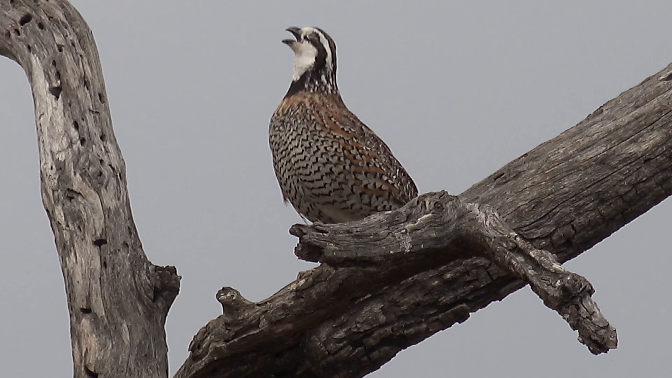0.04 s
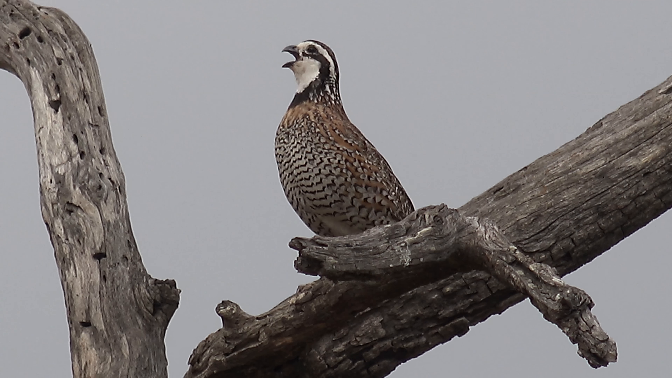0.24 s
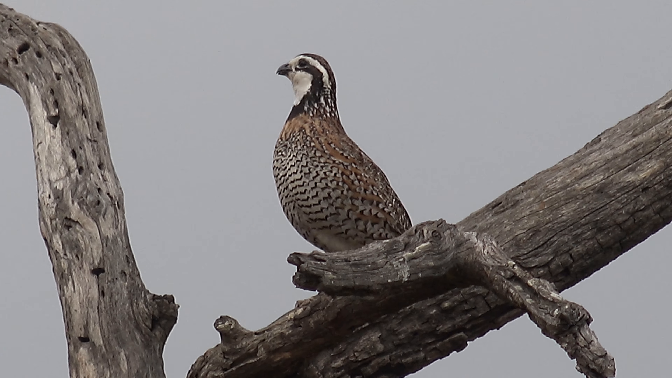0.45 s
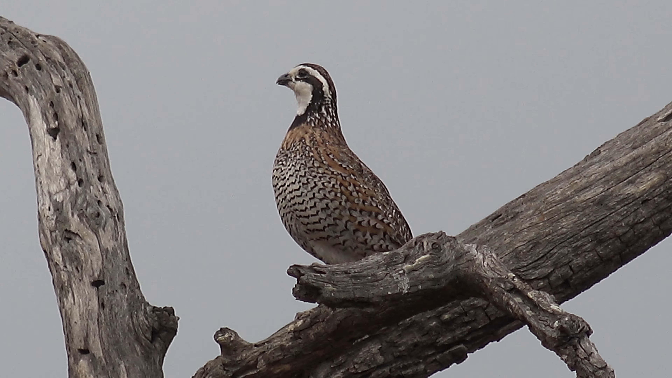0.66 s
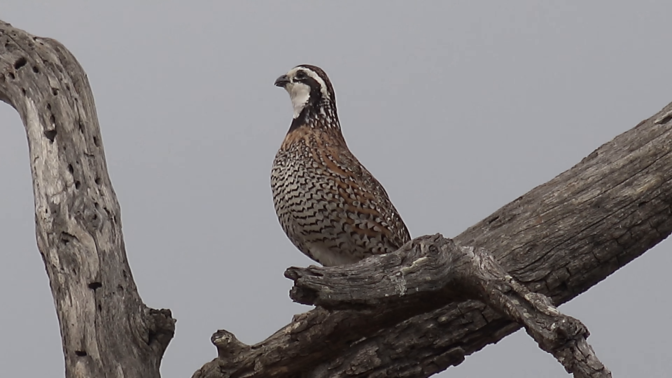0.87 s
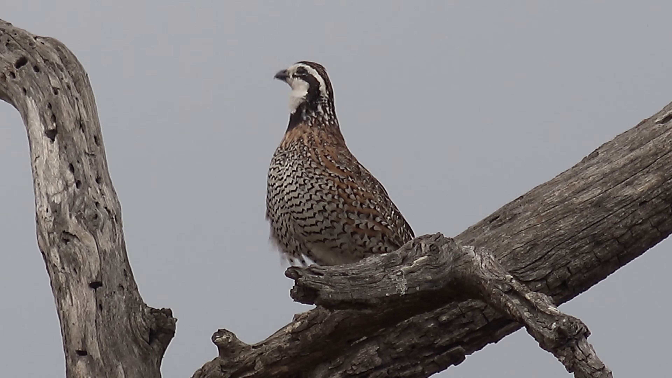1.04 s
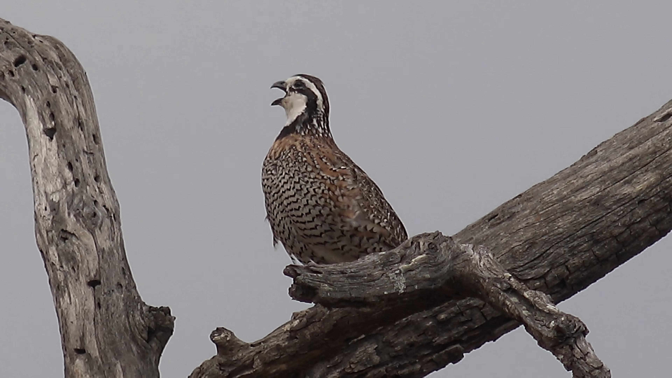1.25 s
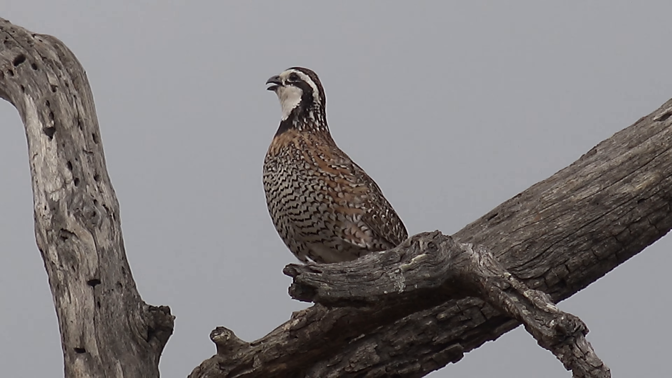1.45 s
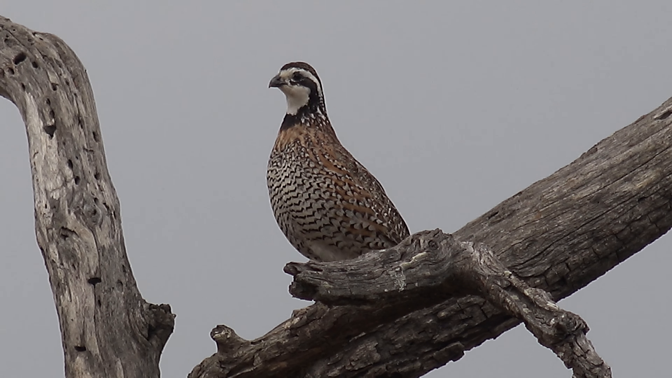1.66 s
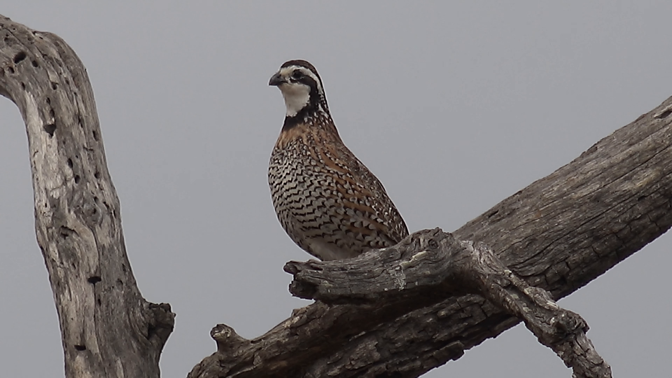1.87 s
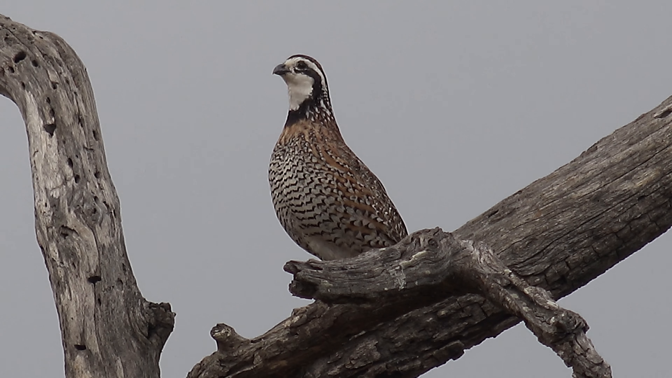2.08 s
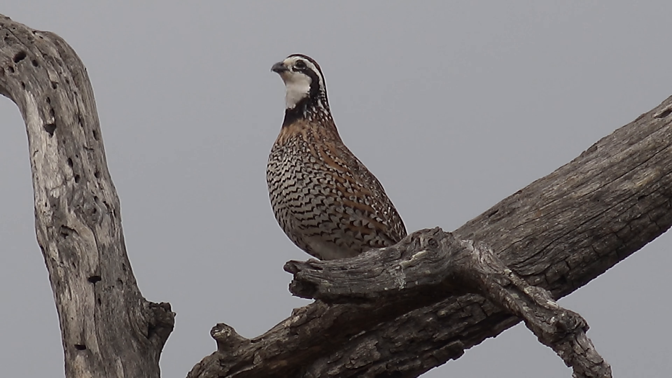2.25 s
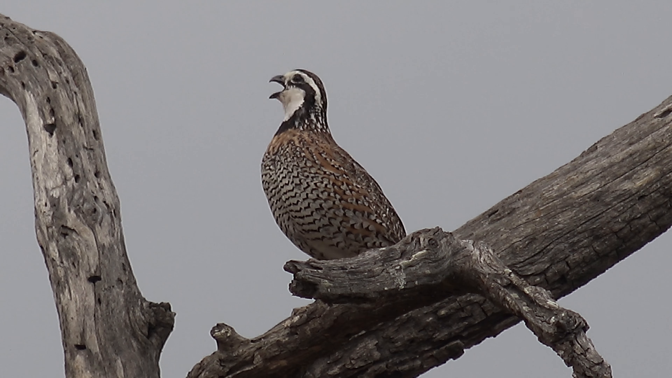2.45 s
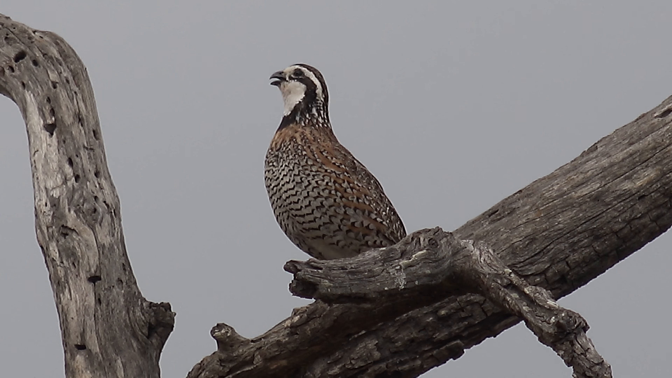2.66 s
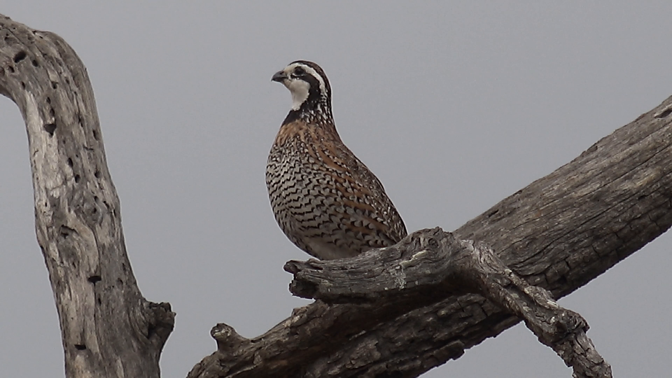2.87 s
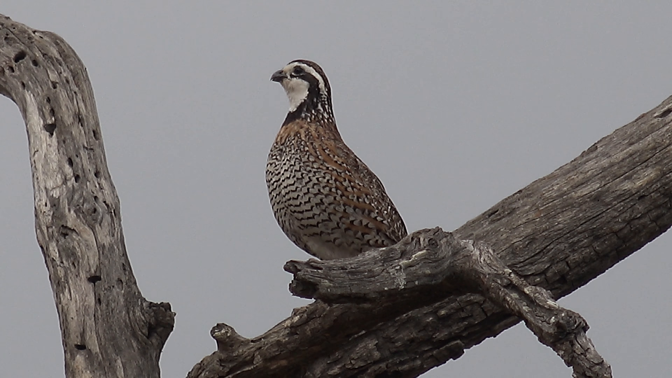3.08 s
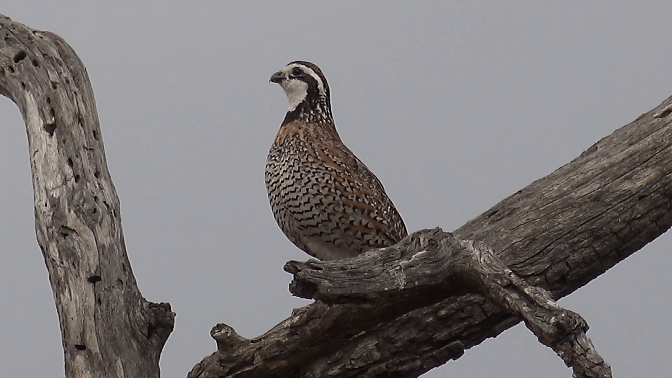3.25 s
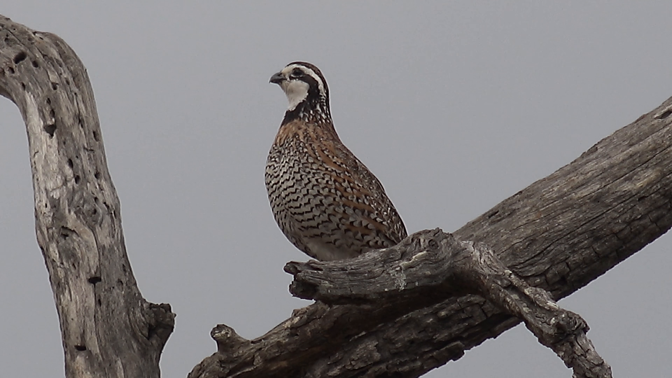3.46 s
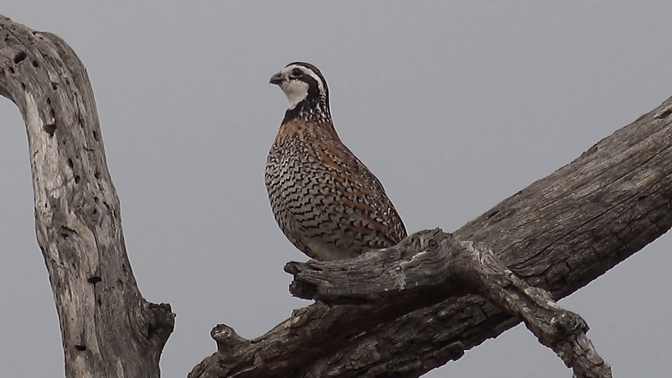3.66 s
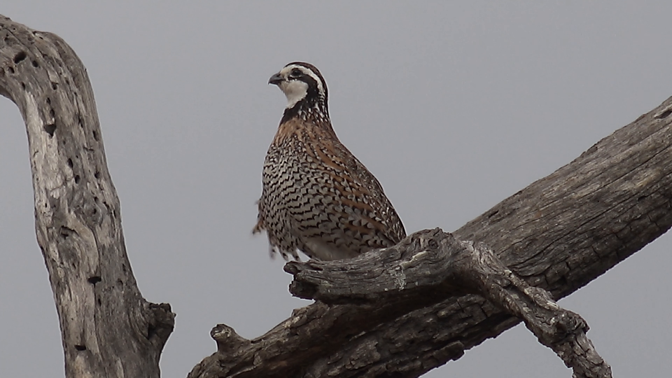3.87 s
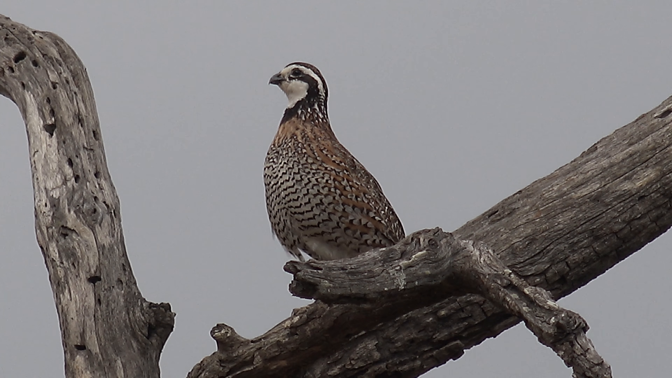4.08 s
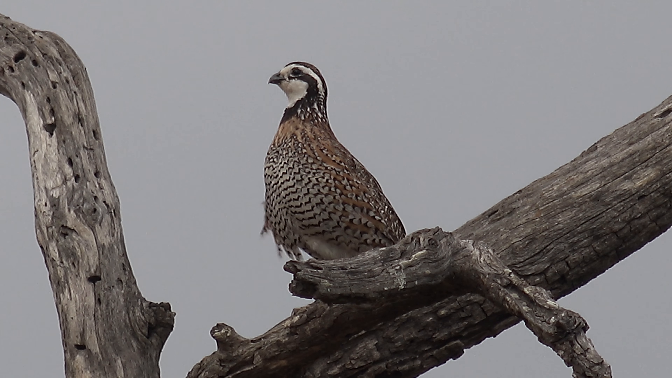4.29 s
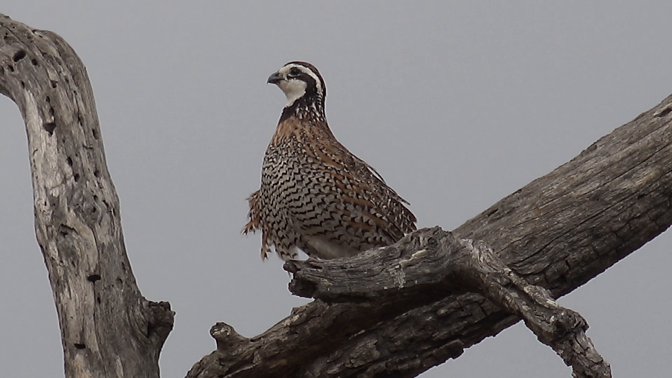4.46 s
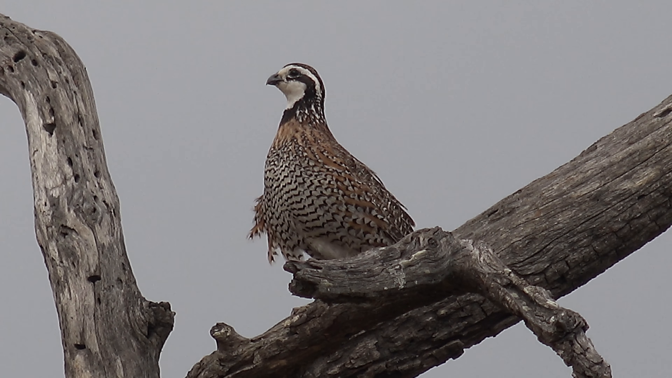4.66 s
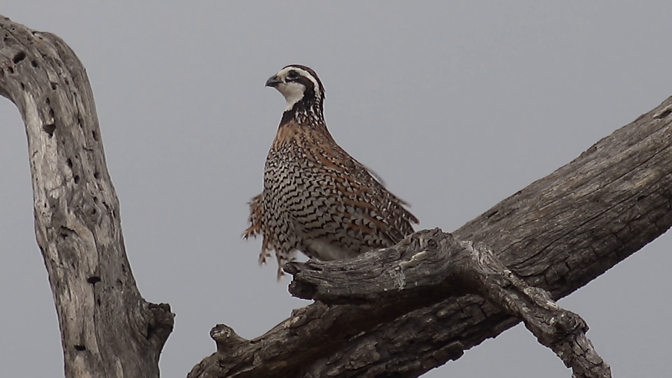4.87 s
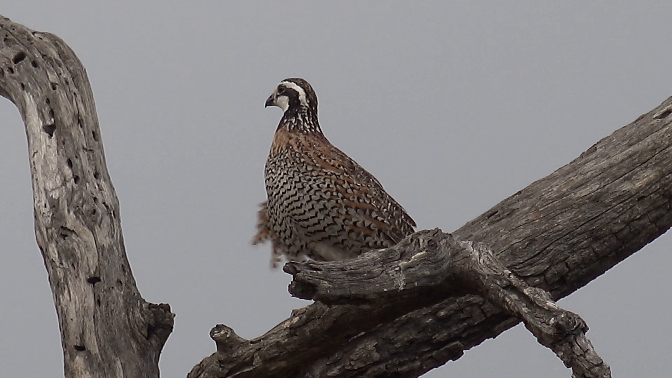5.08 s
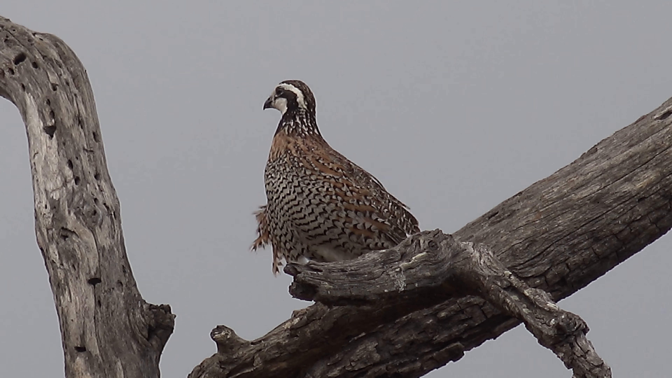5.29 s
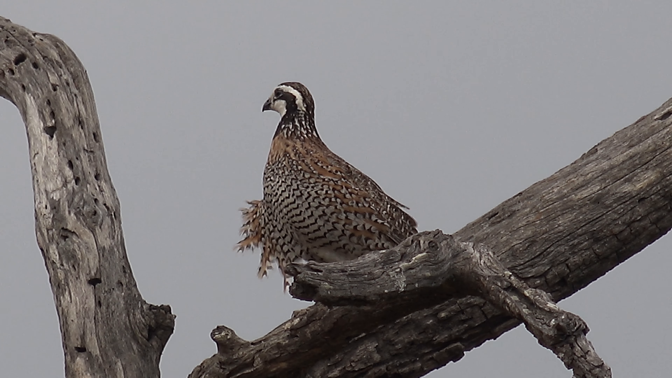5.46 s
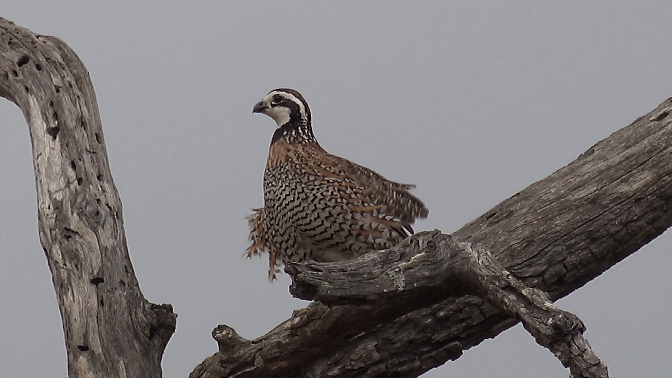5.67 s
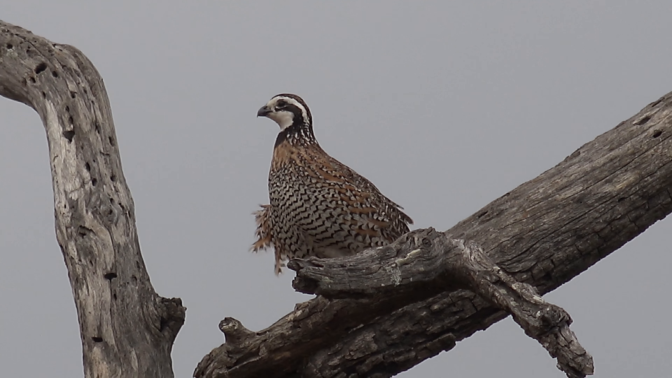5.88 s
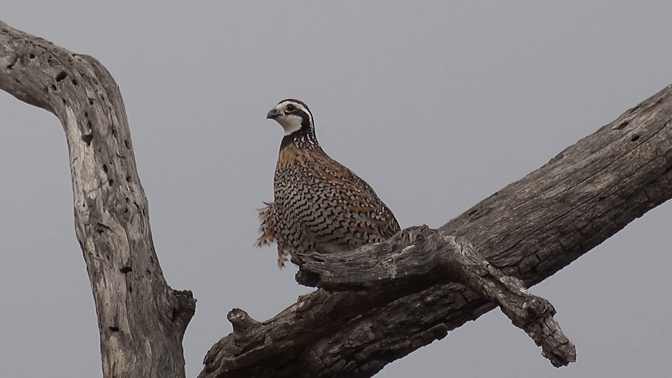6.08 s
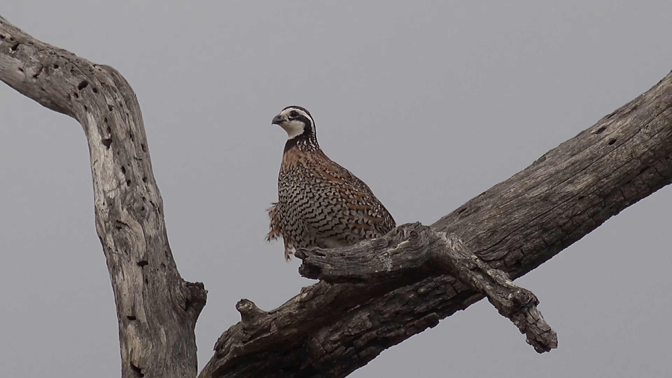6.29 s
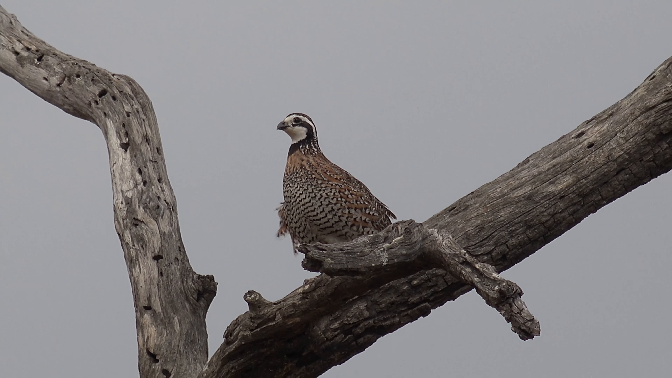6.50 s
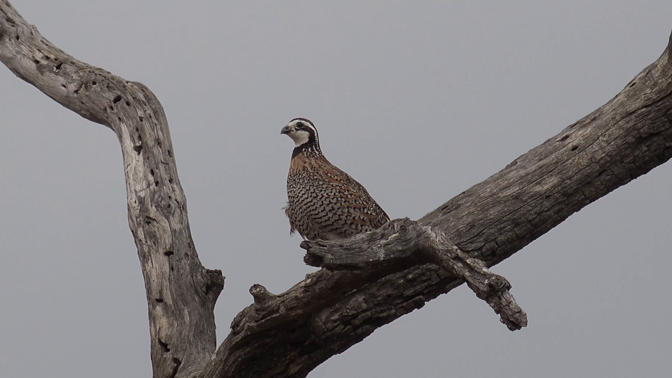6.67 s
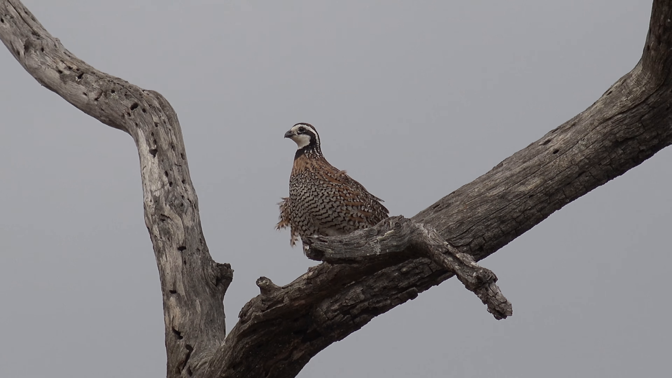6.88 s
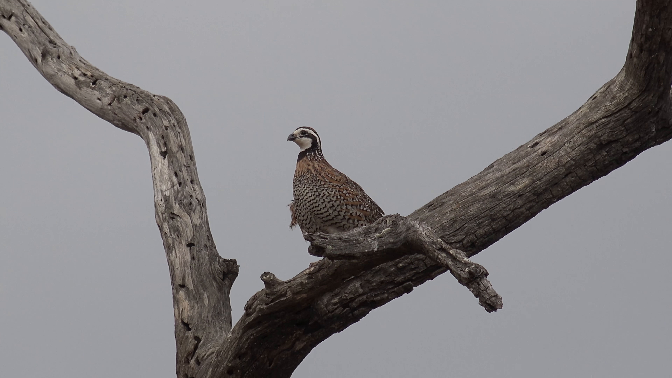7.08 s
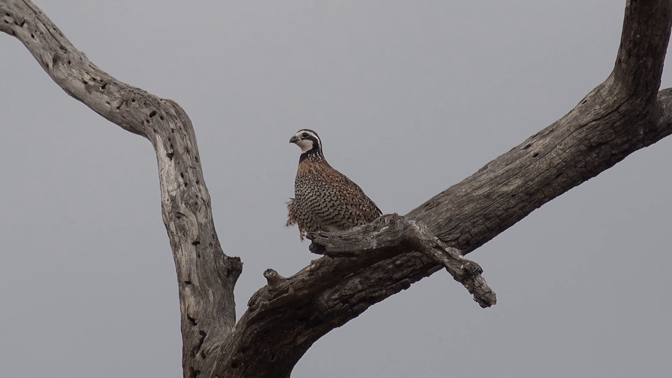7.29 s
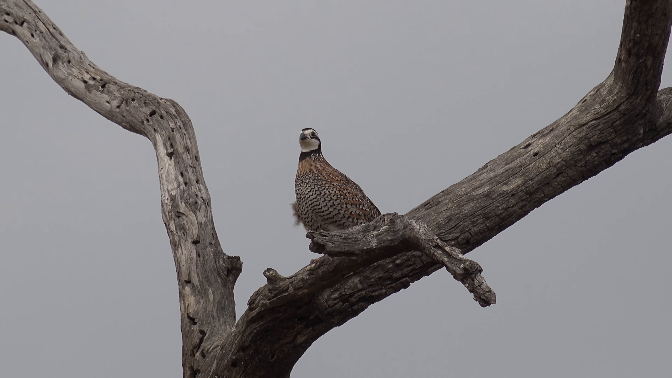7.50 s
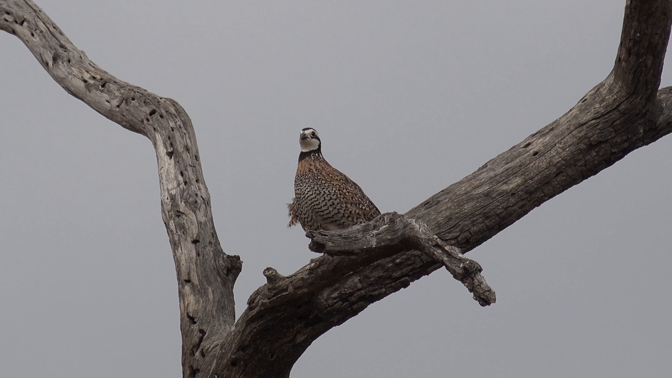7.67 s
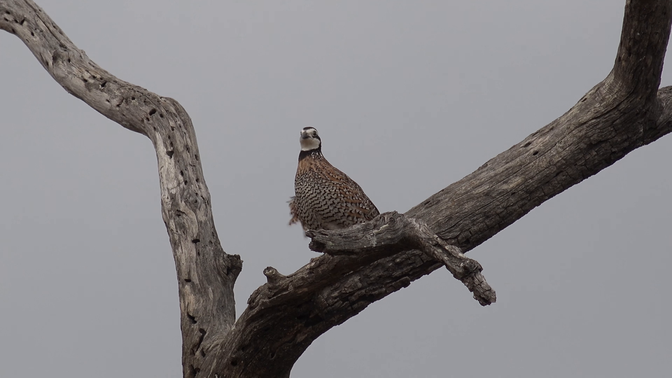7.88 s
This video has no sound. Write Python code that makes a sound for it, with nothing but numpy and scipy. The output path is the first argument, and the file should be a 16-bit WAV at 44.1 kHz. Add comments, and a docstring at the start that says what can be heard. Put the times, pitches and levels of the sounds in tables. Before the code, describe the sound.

A bobwhite quail gives three loud, short whistles about a second apart, each rising in pitch and breaking into a harsh falling slur. A nearby camera shutter clacks during the first call. Afterwards, much fainter songbirds whistle, chip and rasp in the brush over a distant chorus and soft outdoor air. The close shutter clacks again past the middle, with light gear ticks and faint shutters farther off in a small hide.

```python
"""A bobwhite quail whistles three rising calls, each breaking into a harsh falling slur.
The whistle is nearly pure; after the break its harmonics slide past a fixed throat resonance.
Songbirds whistle, chip and rasp in the brush over a far chorus and faint open air.
Still cameras clack mirror and shutter in a small hide, one close by; gear ticks and a stand bumps."""
import sys
import numpy as np
from scipy import signal
from scipy.fft import rfft, irfft, next_fast_len
from scipy.io import wavfile
from scipy.ndimage import uniform_filter1d

SR = 44100
rng = np.random.default_rng(int(sys.argv[2]) if len(sys.argv) > 2 else 0)


def generate_wav(sig):
    """Save sig (samples, or channels by samples) to the path in sys.argv[1] as 16-bit PCM at SR."""
    pcm = np.round(np.clip(np.atleast_2d(sig).T, -1, 1) * 32767).astype(np.int16)
    wavfile.write(sys.argv[1], SR, pcm)


N = 350154
TIME = np.arange(N) / SR
UPSLUR_S, WHISTLE_HZ, WHISTLE_DB = .046, 1868, -6


def quail(throat_db=16, throat_width_hz=620, jitter=.025, flutter_db=2.8, ground_s=.011, ground_db=-15):
    """Harmonic voice through throat and beak; in the fall the throat picks out successive harmonics."""
    # start_s, level_db, pitch_ratio, dip_s (level dip, timed from the start of the whistle)
    calls = [(0.034, -22.5, 1, 0.091), (1.124, -23, 1.003, 0.076), (2.327, -24.5, 1.0, 0.083)]
    # radiation from the open beak: freq_hz, gain_db
    beak = [(650, -15), (1300, -10), (1900, -1), (2600, 0), (3250, 0), (3800, -11), (5100, -10),
            (5600, -40), (6000, -32), (6600, -20), (7700, -20), (9300, -18), (10600, -42), (16000, -58)]
    # air rasping through the throat: freq_hz, density_db
    rasp_spectrum = [(300, -30), (1300, -17), (1900, -3), (2600, 0), (3250, -4), (4000, -18), (7000, -28),
                     (13000, -46)]
    out = np.zeros(N)
    controls = np.hstack([upslur(), whistle(), fall()])
    pitch_hz, throat_hz, level_db, harsh = uniform_filter1d(controls, size=240, axis=1)
    size = len(pitch_hz)
    t = TIME[:size]
    harmonic = np.arange(1, 13)[:, None]
    overtone_db = -3 * harsh ** 2 * (harmonic > 1)
    attack = np.minimum(t / .0033, 1)
    # alternate cycles differ early in the call: a line between the first two harmonics
    undertone_gain = from_db(-36) * (1 - harsh) * np.clip((.15 - t) / .045, 0, 1)
    # turbulence needs a really harsh voice and radiates best at a high throat resonance
    turbulence = np.clip(2 * harsh - .5, 0, 1) * from_db(at_hz(beak, throat_hz) - 11.5)
    for start_s, call_db, pitch_ratio, dip_s in calls:
        hz = pitch_hz * pitch_ratio * (1 + jitter * harsh * wobble(700, size) + .0012 * wobble(120, size))
        partial_hz = harmonic * hz
        resonance_db = throat_db * (bell(partial_hz, throat_hz, throat_width_hz) - 1)
        gains = from_db(at_hz(beak, partial_hz) + resonance_db + overtone_db) * (partial_hz < SR / 2)
        phase = 2 * np.pi * np.cumsum(hz) / SR
        flutter = from_db(flutter_db * harsh * wobble(500, size))
        voice = np.sqrt(2) * np.sum(gains * np.sin(harmonic * phase), axis=0) * flutter
        undertone = undertone_gain * np.sin(1.5 * phase)
        rasp = diffuse(rasp_spectrum, size)[0] * (1 + .5 * np.cos(phase)) * turbulence
        dip_db = -10 * bell(t, UPSLUR_S + dip_s, .0047)
        add(out, start_s, (voice + undertone + rasp) * attack * from_db(level_db + call_db + dip_db))
    # the ground bounce beats against the fast sweeps and thickens them
    bounce = from_db(ground_db) * np.interp(TIME - ground_s, TIME, out, left=0)
    direct = place(out + bounce, pan_db=1.8, lead_samples=1.2)
    return direct + brush(out, early_db=-18, early_t60_s=.24, late_db=-34, late_t60_s=1.2)


def upslur(rise_s=.018, leap_s=.011):
    """Soft hoarse opening: rise, step, leap to the whistle. Rows: pitch_hz, throat_hz, level_db, harsh."""
    t = TIME[:round(UPSLUR_S * SR)]
    stages_s = [0, rise_s, UPSLUR_S - leap_s, UPSLUR_S]
    pitch_hz = np.interp(t, stages_s, [830, 1291, 1419, WHISTLE_HZ])
    level_db = np.interp(t, stages_s, [-24.5, -22.5, -18, WHISTLE_DB])
    harsh = np.interp(t, stages_s, [.46, .92, .92, 0])
    return [pitch_hz, pitch_hz, level_db, harsh]


def whistle(length_s=.154, bend_hz=326.8, bend_s=.042, swell_db=6, surge_db=7.5, surge_s=.0027, harsh=.04):
    """Swells, bends ever faster upward, surges before the break; throat tracks pitch. Rows as upslur."""
    t = TIME[:round(length_s * SR)]
    pitch_hz = WHISTLE_HZ + bend_hz * np.exp((t - length_s) / bend_s)
    level_db = WHISTLE_DB + swell_db * t / length_s + surge_db * bell(t, length_s - surge_s, surge_s)
    return [pitch_hz, pitch_hz, level_db, np.full(len(t), harsh)]


def fall(length_s=.098, slide_hz_per_s=8700, throat_hz=2562, edge_s=.013, fade_db=12, harsh=.66):
    """The broken voice catches in a higher register, then drops and fades. Rows as upslur."""
    t = TIME[:round(length_s * SR)]
    register_hz = 230.8 * (t < .014)
    pitch_hz = 1480 - slide_hz_per_s * t + register_hz
    edges_db = np.interp(t, [0, edge_s, length_s - edge_s, length_s], [-9, 0, 0, -20])
    level_db = -3 - fade_db * t / length_s + edges_db
    return [pitch_hz, np.full(len(t), throat_hz), level_db, np.full(len(t), harsh)]


def cameras(latch_s=.0037, latch_db=-4.5, rebound_s=.0115):
    """Close camera: latch, blow and rebound of mirror and shutter. Far ones repeat one mirror cycle."""
    # close mirror and shutter blows: start_s, relative_db, rebound_db
    close_blows = [(0.203, -20, -2.5), (0.2548, -19.5, 1), (0.291, -26.5, -30), (5.2483, -19.5, -5.5),
                   (5.288, -25.5, -23)]
    # far shutter releases: start_s, relative_db
    releases = [(0.706, -42), (2.524, -41), (2.962, -47), (4.189, -41.5), (5.205, -44), (5.449, -46),
                (5.931, -41.5), (7.173, -46.5), (7.879, -52)]
    # contacts of mirror up, shutter, mirror down: delay_s, relative_db
    mirror_cycle = [(0, -4), (0.017, -4), (.096, -3), (0.102, -3.5), (.136, -9.5), (0.146, -3)]
    far_contacts = [(start_s + delay_s, release_db + contact_db)
                    for start_s, release_db in releases for delay_s, contact_db in mirror_cycle]
    close_contacts = [(start_s + delay_s, blow_db + contact_db)
                      for start_s, blow_db, rebound_db in close_blows
                      for delay_s, contact_db in [(-latch_s, latch_db), (0, 0), (rebound_s, rebound_db)]]
    far = clacks(far_contacts, crack_t60_s=.069, tail_db=-5, tail_t60_s=.22,
                 grain_db=-3.5, boom_db=4.5, treble_db=-62, pan_db=3)
    close = clacks(close_contacts, crack_t60_s=.078, tail_db=-17.5, tail_t60_s=.18,
                   grain_db=2.5, boom_db=-3, treble_db=-.5, pan_db=5)
    return from_db(-4.5) * far + from_db(-9.5) * close


def clacks(contacts, crack_t60_s, tail_db, tail_t60_s, grain_db, boom_db, treble_db, pan_db):
    """Each contact is a rattling crack of the body; the hide rings on, longer and later in the lows."""
    # ring of a camera body: freq_hz, density_db
    body_spectrum = [(40, -53), (90, -11), (200, -25), (280, -20.5), (350, -1.5), (450, -13.5), (700, -0.5),
                     (1050, -4.5), (1500, 1), (2500, 4), (4500, 4), (7000, -6.5), (10000, -16),
                     (15000, -22.5)]
    crack_power, tail_power, boom_power = np.zeros((3, N))
    t = TIME[:SR // 2]
    boom_shape = np.minimum(t / .0009, 1) * from_db(-60 * t / (1.29 * tail_t60_s))
    for start_s, level_db in contacts:
        add(crack_power, start_s, from_db(level_db - 60 * t / crack_t60_s) ** 2)
        add(tail_power, start_s, from_db(level_db + tail_db - 60 * t / tail_t60_s) ** 2)
        add(boom_power, start_s, (from_db(level_db + boom_db) * boom_shape) ** 2)
    ring = diffuse(body_spectrum, N)
    lows = butterworth(diffuse(body_spectrum, N), "low", 1700, order=2)
    bright = ring + from_db(treble_db) * butterworth(ring, "high", 6000)
    rattle = from_db(grain_db * np.tanh(wobble(740, N)))
    crack = bright * np.sqrt(crack_power) * rattle
    hide = ring * np.sqrt(tail_power) + lows * np.sqrt(boom_power)
    return (crack + hide) * from_db([[pan_db / 2], [-pan_db / 2]])


def gear_ticks(tail_db=-17, tail_t60_s=.054):
    """Light touches on the gear: one broad resonance each and a short ring of the hide."""
    # start_s, level_db, resonance_hz, width_hz, t60_s
    touches = [(2.017, -51.5, 1280, 700, 0.057), (2.187, -50, 1600, 1600, 0.17),
               (2.218, -47.5, 1420, 1080, 0.12), (4.599, -51.5, 1190, 897.5, 0.091),
               (4.6, -39.5, 4100, 2430, 0.012), (5.045, -28, 5300, 2230, 0.022),
               (5.052, -42, 5040, 3000, 0.095), (5.14, -54, 2090, 1440, 0.18),
               (7.727, -40.5, 1310, 795, 0.032)]
    out, t = np.zeros((2, N)), TIME[:SR // 4]
    for start_s, level_db, resonance_hz, width_hz, t60_s in touches:
        radius = np.exp(-np.pi * width_hz / SR)
        feedback = [1, -2 * radius * np.cos(2 * np.pi * resonance_hz / SR), radius ** 2]
        noise = diffuse([(200, .5), (1500, 3), (15000, -10)], len(t))
        body = rms_one(signal.lfilter([1, 0, -1], feedback, noise))
        decay = from_db(-60 * t / t60_s) + from_db(tail_db - 60 * t / tail_t60_s)
        add(out, start_s, from_db(level_db) * body * decay)
    return out * from_db([[1.2], [-1.8]])


def songbirds(hoarse=.75, whip_middle_hz=3690, whip_hz_per_s=52300, pip_hz=3960, pip_gap_s=.065):
    """Whistled notes from the brush, one pitch shape per kind, wet with distance."""
    out = np.zeros(N)

    def sing(start_s, level_db, pitch_hz, buzz, throb_db=2):
        add(out, start_s, from_db(level_db) * note(pitch_hz, buzz, throb_db))

    # start_s, length_s, first_hz, last_hz, level_db
    held_whistles = [(0.996, 0.2, 5010, 5120, -70.5), (3.183, 0.038, 3370, 3520, -60),
                     (3.719, 0.15, 3170, 3170, -64.5), (3.935, 0.15, 3240, 3260, -60),
                     (5.643, 0.21, 3615, 3707, -56), (6.278, 0.25, 3552, 3690, -60),
                     (7.378, .36, 3635, 3595, -55)]
    for start_s, length_s, first_hz, last_hz, level_db in held_whistles:
        sing(start_s, level_db, slide(length_s, first_hz, last_hz), buzz=.37, throb_db=2.16)
    # start_s, level_db
    far_rises = [(6.133, -74.5), (6.523, -72.5)]
    for start_s, level_db in far_rises:
        sing(start_s, level_db, glide(.15, (1535, 1930, 2155)), buzz=0)
    # start_s, length_s, last_hz, level_db
    upward_whips = [(3.567, .036, 3840, -53.5), (3.875, 0.037, 3670, -53), (4.165, 0.034, 3820, -52.5),
                    (4.47, 0.018, 4250, -47.5), (4.757, 0.018, 4260, -52.5), (5.614, 0.029, 4100, -51),
                    (6.261, 0.022, 4660, -53), (6.677, 0.0203, 4440, -62), (7.05, 0.015, 4800, -58.5),
                    (7.127, 0.018, 4450, -61), (7.776, 0.019, 5000, -62)]
    for start_s, length_s, last_hz, level_db in upward_whips:
        first_hz = whip_middle_hz - whip_hz_per_s * length_s / 2
        sing(start_s, level_db, glide(length_s, (first_hz, whip_middle_hz, last_hz)), hoarse)
    # start_s, first_hz, last_hz, level_db
    rasps = [(1.635, 2560, 2090, -71), (2.045, 2640, 2065, -65), (4.43, 2400, 3580, -57),
             (4.541, 3410, 2380, -54), (5.956, 2690, 2140, -58.5), (6.157, 2650, 2276, -54.5),
             (6.354, 2700, 2250, -55), (6.575, 2667, 2267, -57), (6.816, 2680, 2314, -56.5),
             (7.01, 2250, 1880, -66.5)]
    for start_s, first_hz, last_hz, level_db in rasps:
        sing(start_s, level_db, slide(.056, first_hz, last_hz), hoarse)
    # clear arched whistles that trail off hoarsely: start_s, length_s, level_db
    arches = [(1.775, 0.15, -69), (2.869, 0.071, -65.5), (4.735, .13, -55), (5.522, 0.1, -55.5)]
    for start_s, length_s, level_db in arches:
        sing(start_s, level_db, glide(length_s, (2440, 2590, 2270)), buzz=.15)
        sing(start_s + .75 * length_s, level_db - 6, glide(.15, (2440, 2320, 2242)), hoarse)
    # high swoop, then a lower slur: start_s, pitch_ratio, level_db
    two_note_songs = [(3.175, 0.96, -59.5), (6.832, 0.95, -61)]
    for start_s, pitch_ratio, level_db in two_note_songs:
        sing(start_s, level_db, pitch_ratio * glide(.14, (7340, 4670, 4330)), buzz=.28)
        sing(start_s + .16, level_db - 2.5, pitch_ratio * glide(.17, (3856, 3340, 2485)), buzz=.16)
    # start_s, level_db
    downward_flicks = [(1.605, -80), (1.649, -68), (1.88, -63.5), (2.084, -70), (2.263, -63), (2.865, -72),
                       (6.771, -65)]
    for start_s, level_db in downward_flicks:
        sing(start_s, level_db, glide(.036, (5350, 4450, 3320)), buzz=.1)
    # start_s, level_db
    pip_pairs = [(1.445, -61.5), (3.229, -60.5), (4.149, -56), (5.144, -58), (6.493, -58)]
    for start_s, level_db in pip_pairs:
        for delay_s in 0, pip_gap_s:
            sing(start_s + delay_s, level_db, slide(.037, pip_hz, pip_hz), buzz=0)
    # start_s, level_db
    buzzes = [(3.464, -59), (3.776, -60.5)]
    for start_s, level_db in buzzes:
        sing(start_s, level_db, slide(.048, 4210, 4210), hoarse)
    # start_s, level_db
    chips = [(1.691, -56.5), (1.954, -62), (2.164, -55.5), (2.423, -52.5), (5.46, -58), (5.741, -59),
             (6.081, -61)]
    # hooked shape of a chip: time_s, pitch_hz
    hook = [(0, 6700), (.003, 5700), (.007, 5450), (.015, 5700), (.026, 5980)]
    hook_hz = np.interp(TIME[:round(hook[-1][0] * SR)], *np.transpose(hook))
    for start_s, level_db in chips:
        sing(start_s, level_db, hook_hz, buzz=.45)
    # start_s, level_db
    thin_lisps = [(5.43, -77), (5.562, -66.5), (5.725, -79), (5.885, -78), (6.05, -67), (6.279, -72.5),
                  (6.47, -79), (6.621, -79)]
    for start_s, level_db in thin_lisps:
        sing(start_s, level_db, glide(.045, (7300, 8600, 8200)) * rng.uniform(.86, 1.02), buzz=.35)
    direct = place(out, pan_db=2, lead_samples=.7)
    return direct + brush(out, early_db=-7, early_t60_s=.25, late_db=-11, late_t60_s=.8)


def note(pitch_hz, buzz, throb_db=2):
    """Soft-edged whistle; buzz shakes its pitch and strength. Low notes are the hoarsest."""
    size = len(pitch_hz)
    jitter = buzz * np.hypot(.039, .05 * (pitch_hz < 3300))
    shaken_hz = pitch_hz * (1 + jitter * wobble(600, size))
    envelope = np.hanning(size) ** .34 * from_db(throb_db * (2.02 + buzz) * wobble(129.35, size))
    return rms_one(envelope * np.sin(2 * np.pi * np.cumsum(shaken_hz) / SR))


def far_chorus(count=130, twitter_db=-7, wash_db=-4):
    """Many far birds: random twitters over a wash blurred by distance."""
    # time_s, level_db
    contour = [(0.0, -60), (0.68, -71.5), (1.24, -65.5), (2.21, -65.5), (2.56, -59), (2.74, -63),
               (4.14, -59.5), (4.82, -63), (5.79, -65), (6.12, -74.5), (7.63, -65), (7.94, -70)]
    # freq_hz, density_db
    wash_spectrum = [(1200, -9), (2300, -5.5), (3000, -5.5), (3900, -0.5), (5500, -10.5), (8000, -16.5),
                     (14000, -36)]
    notes = np.zeros(N)
    for when, length, height, bend, strength in rng.random((count, 5)):
        middle_hz = 2200 * 2 ** (1.05 * height)
        shape = glide(.025 + .078 * length, (1.15 - .29 * bend, 1, .8 + .388 * bend))
        add(notes, when * N / SR, from_db(15 * strength) * note(middle_hz * shape, buzz=.49))
    scatter = brush(notes, early_db=-15, early_t60_s=.23, late_db=-1.5, late_t60_s=.19)
    twitter = from_db(twitter_db) * rms_one(place(notes, pan_db=6.5, lead_samples=.55) + scatter)
    wash = diffuse(wash_spectrum, N) * from_db(wash_db + .49 * wobble(31, N))
    return from_db(np.interp(TIME, *np.transpose(contour))) * (twitter + wash)


def stand_bumps(attack_s=.011, t60_s=.44, gain_db=4):
    """The nudged camera stand gives a short low rumble."""
    # start_s, relative_db
    nudges = [(1.272, -75), (2.17, -75.5), (3.051, -67.5), (5.268, -69)]
    spectrum = [(30, -29.5), (85, 7), (130, -3), (250, -9), (700, -37.5), (3000, -78)]
    out, t = np.zeros((2, N)), TIME[:SR // 2]
    envelope = np.minimum(t / attack_s, 1) * from_db(gain_db - 60 * t / t60_s)
    for start_s, relative_db in nudges:
        add(out, start_s, diffuse(spectrum, len(t)) * envelope * from_db(relative_db))
    return out


def open_air(level_db=-66.5):
    """Steady faint outdoor noise."""
    # freq_hz, density_db
    spectrum = [(15, -40), (25, -14), (157, -0.5), (276, 0), (473, 0.5), (557, 1), (691, -2.5), (791, -1),
                (1730, -7.5), (1980, -5), (2520, -12), (2890, -32), (4100, -10.5), (6490, -14),
                (15800, -19.5)]
    return from_db(level_db) * diffuse(spectrum, N) * from_db([[.4], [-.4]])


def brush(x, early_db, early_t60_s, late_db, late_t60_s):
    """Scatter from near branches plus a tail from the far scrub."""
    t = TIME[:SR]
    onset = np.clip((t - .004) / .016, 0, 1)
    response = 0
    for level_db, t60_s in (early_db, early_t60_s), (late_db, late_t60_s):
        echo = diffuse([(300, 17), (3500, 5), (12000, -5.5)], SR) * from_db(-60 * t / t60_s) * onset
        response += echo * from_db(level_db) / np.sqrt(np.sum(echo ** 2) / 2)
    return signal.fftconvolve(x[None], response, axes=1)[:, :N]


def diffuse(spectrum, size):
    """Unit-RMS stereo noise, partly alike in both channels. Spectrum: freq_hz, density_db."""
    # left-right likeness of diffuse sound: freq_hz, coherence
    likeness = [(50, 1), (170, 0.32), (400, 0.15), (900, 0.21), (2500, 0.57), (5000, 0.63), (9000, 0.17),
                (14000, 0.1)]
    fft_size = next_fast_len(size, True)
    hz = np.fft.rfftfreq(fft_size, 1 / SR)
    mid, side = rfft(rng.standard_normal((2, fft_size))) * from_db(at_hz(spectrum, hz))
    coherence = at_hz(likeness, hz)
    pair = np.sqrt(1 + coherence) * mid + np.sqrt(1 - coherence) * side * [[1], [-1]]
    return rms_one(irfft(pair, fft_size)[:, :size])


def place(x, pan_db, lead_samples):
    """A source to the left is louder and earlier there."""
    whole, fraction = divmod(lead_samples, 1)
    delayed = signal.lfilter([1 - fraction, fraction], [1], np.roll(x, int(whole)))
    return np.array([x * from_db(pan_db / 2), delayed * from_db(-pan_db / 2)])


def glide(length_s, pitches):
    """Parabola through a first, a middle and a last pitch."""
    along = np.linspace(0, 1, round(length_s * SR))
    return np.polyval(np.polyfit([0, .5, 1], pitches, 2), along)


def slide(length_s, first_hz, last_hz):
    return np.linspace(first_hz, last_hz, round(length_s * SR))


def wobble(rate_hz, size):
    """Smooth random curve, spread about 1."""
    knots = rng.standard_normal(size // 8 + 4)
    return np.interp(np.arange(size) * rate_hz / SR, np.arange(len(knots)), knots)


def at_hz(points, hz):
    """Interpolate on a log-frequency axis."""
    freq_hz, value = np.transpose(points)
    return np.interp(np.log(np.maximum(hz, 1)), np.log(freq_hz), value)


def add(out, start_s, sound):
    i = max(round(start_s * SR), 0)
    out[..., i:i + sound.shape[-1]] += sound[..., :max(N - i, 0)]


def butterworth(x, kind, cutoff_hz, order=1):
    return signal.sosfilt(signal.butter(order, cutoff_hz, kind, fs=SR, output="sos"), x)


def bell(x, centre, width):
    return np.exp(-((x - centre) / width) ** 2)


def from_db(db):
    return 10 ** (np.asarray(db) / 20)


def rms_one(x):
    return x / np.sqrt(np.mean(x ** 2) + 1e-20)


def scene():
    air = open_air()
    return quail() + songbirds() + far_chorus() + cameras() + gear_ticks() + stand_bumps() + air


def record(dry, low_cut_hz=50, high_cut_hz=15900):
    """Closely spaced microphone pair, narrow in the bass and wider above; both ends are cut."""
    # stereo width: freq_hz, side_gain_db
    width = [(60, -4.5), (130, -6), (400, 0), (1300, 4), (4000, -1), (7000, -0.5), (9500, 2), (13000, -8)]
    mid, side = (dry[0] + dry[1]) / 2, (dry[0] - dry[1]) / 2
    size = next_fast_len(N, True)
    side_gain = from_db(at_hz(width, np.fft.rfftfreq(size, 1 / SR)))
    side = irfft(rfft(side, size) * side_gain, size)[:N]
    pair = butterworth([mid + side, mid - side], "high", low_cut_hz)
    return signal.sosfilt(signal.ellip(10, .2, 80, high_cut_hz, fs=SR, output="sos"), pair)


dry = scene()
out = record(dry)
generate_wav(out)
```